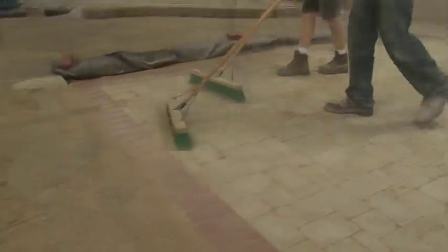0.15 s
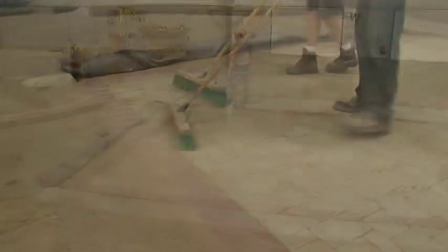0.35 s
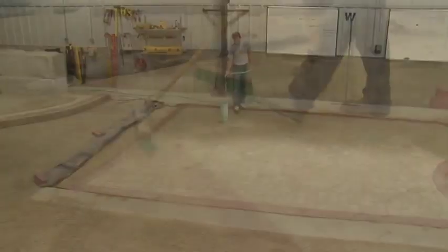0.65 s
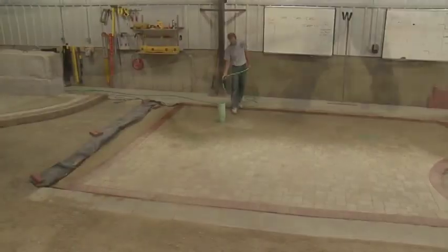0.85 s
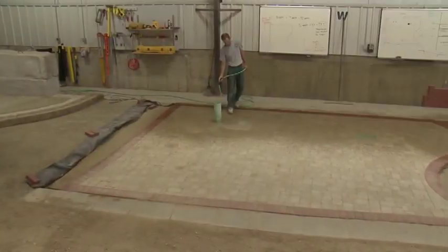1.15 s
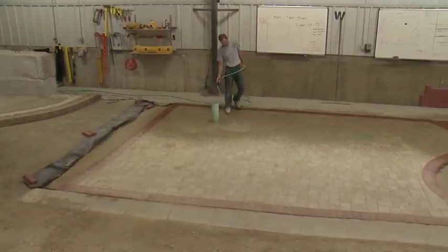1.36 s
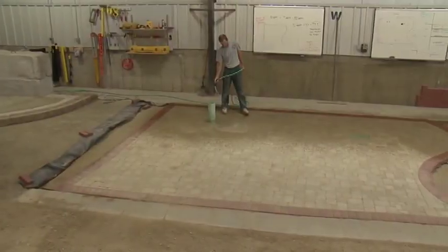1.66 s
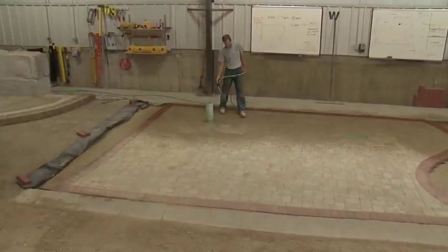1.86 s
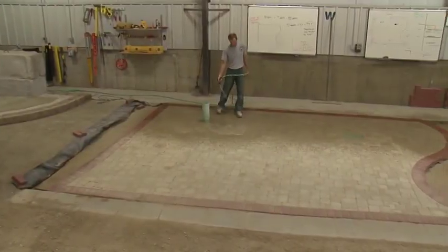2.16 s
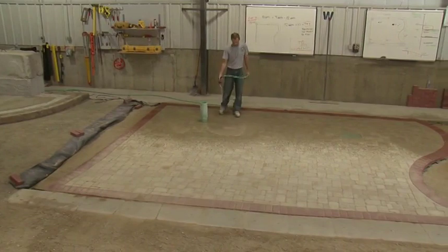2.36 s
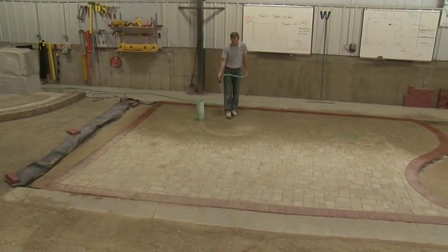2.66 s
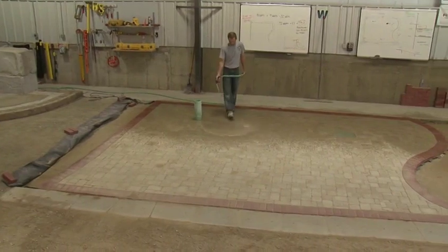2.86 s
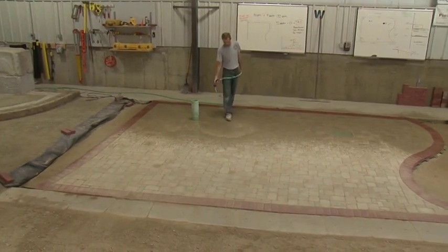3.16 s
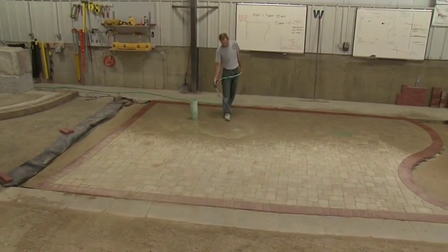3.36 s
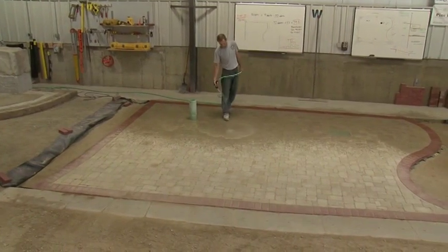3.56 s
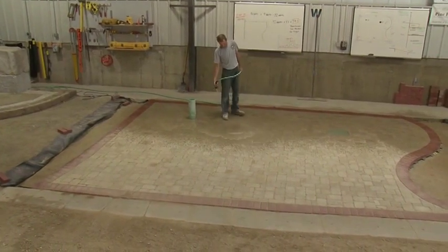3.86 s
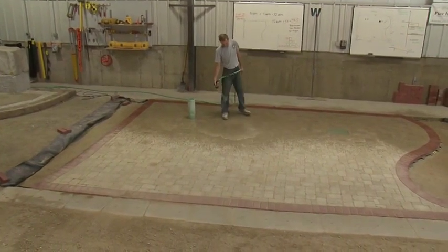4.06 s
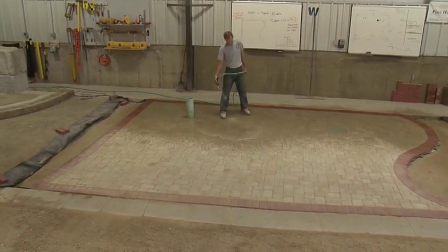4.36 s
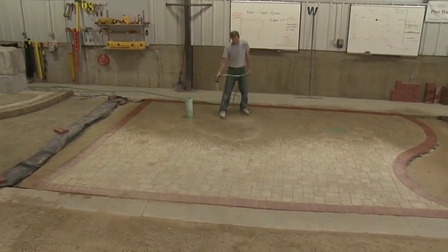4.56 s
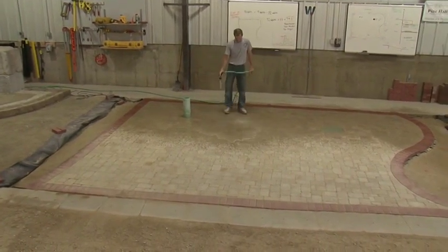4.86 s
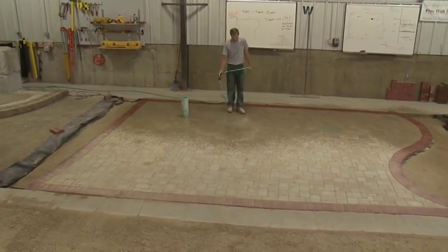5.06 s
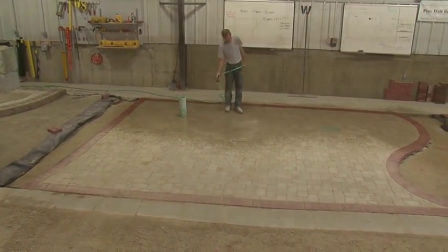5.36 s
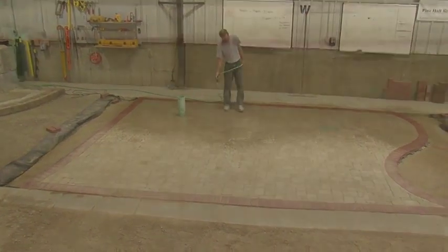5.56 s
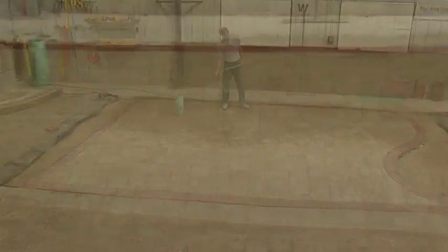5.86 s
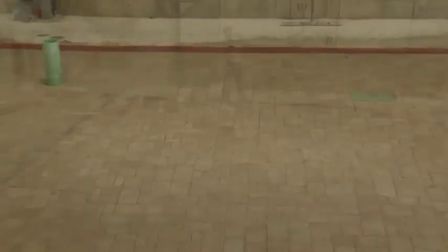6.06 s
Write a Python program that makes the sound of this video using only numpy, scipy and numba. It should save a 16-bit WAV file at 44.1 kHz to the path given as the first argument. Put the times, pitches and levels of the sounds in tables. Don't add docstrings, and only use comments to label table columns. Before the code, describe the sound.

Continuous scratchy sweeping, nearly all treble, with a hollow sliding colour that shifts on every stroke. Sharp grain snaps crowd the first three seconds, then thin out. Low dull bumps land near two seconds and again, strongest, near five. Beneath lie quiet air and distant machinery rumble. The single distant microphone hears a lightly reverberant shed, essentially centred, before a final fade.

```python
import sys
import numpy as np
from scipy import signal
from scipy.fft import rfft, irfft
from scipy.io import wavfile
from scipy.ndimage import uniform_filter1d, map_coordinates
from numba import njit

SR = 44100
rng = np.random.default_rng(int(sys.argv[2]) if len(sys.argv) > 2 else 0)


def store_wav(level_fs):
    pcm = np.round(np.clip(np.atleast_2d(level_fs), -1, 1) * 32767)
    wavfile.write(sys.argv[1], SR, pcm.T.astype(np.int16))


def invert_db(x):
    u = np.asarray(x, float) / 20
    return 10 ** u


N = 273155

# start_s [s], peak_db [dB], ring_hz [Hz]
BIG_HITS = [(0.5651, -2, 5980), (0.7527, -3, 5540), (0.8104, -4, 6660), (0.8919, -5, 6650),
            (1.0164, -4, 6260), (1.075, -3, 7240), (1.3544, -4, 6800), (1.477, -2, 6860),
            (1.5095, -1, 7220), (1.7175, -3, 7400), (1.9255, -4, 5850), (1.9679, -2, 8070),
            (2.0484, -4, 11600), (2.2593, -3, 5040), (2.4678, -4, 7190), (2.5257, -4, 7700),
            (2.596, -5, 8450), (2.6688, -2, 9130), (2.8624, -3, 9300), (3.039, 0, 7330),
            (3.0614, -1, 5280), (3.2201, -2, 5480), (3.9724, -3, 6590), (4.0128, -2, 4310),
            (4.1091, -4, 8280), (4.5835, -3, 9750), (4.7975, -2, 9180), (5.2574, -4, 4070),
            (5.2914, -3, 6450), (5.439, -3, 7600)]
# middle_s [s], length_s [s], low_loss_db [dB], middle_loss_db
# [dB]
BAND_DIPS = [(0.036, 0.062, 13, 10), (0.199, 0.055, 9, 8), (0.298, 0.089, 11.5, 4.5),
             (0.423, 0.15, 10, 6.5), (0.588, 0.088, 9, 9), (.7, 0.039, -3, -3), (0.946, 0.19, 11, 8),
             (1.21, 0.15, 10, 9), (1.552, 0.06, 5.5, 8), (1.611, 0.074, 7, 8.5), (1.72, .04, 7, 5),
             (1.79, 0.032, 26, 9), (1.869, .03, 10, 15), (2.079, 0.058, 19, 27), (2.647, .04, 1, 9.5),
             (3.322, 0.13, 19, 8.5), (3.408, 0.053, 18, -1), (3.582, 0.049, 22, 6), (3.76, 0.073, 13, 1),
             (4.177, .045, 16, -20), (4.263, 0.048, 44, 7), (4.415, 0.047, 17, -20), (4.518, 0.11, 8, -12),
             (4.92, 0.032, 16, 16), (5.325, 0.088, 10, 9.5), (5.835, 0.17, 10, 8.5), (5.996, 0.062, 7, 11),
             (6.075, 0.074, 10, 9.5)]
SNAP_LAG_S = 0.0009


def unit(x):
    return x / np.sqrt(np.mean(x ** 2))


def curve(table):
    s, *columns = np.transpose(table)
    return [np.interp(np.arange(N) / SR, s, c) for c in columns]


def humps(table, order=2):
    t = np.arange(N) / SR
    total = 0
    for middle_s, length_s, *heights in table:
        hump = np.clip(1 - (2 * (t - middle_s) / length_s) ** order, 0, 1)
        total = total + np.outer(heights, hump)
    return total


def walk(rate):
    k = int(SR / rate)
    held = np.repeat(rng.standard_normal(N // k + 1), k)
    return 0.79 * uniform_filter1d(held, k)[:N]


def shape_db(table, hz):
    f, db = np.transpose(table)
    return np.interp(np.log(np.maximum(hz, 1)), np.log(f), db)


def colour(x, table, size=4096):
    cep = irfft(np.log(invert_db(shape_db(table, np.arange(size // 2 + 1) * SR / size))))
    cep[1:size // 2] *= 2
    cep[size // 2 + 1:] = 0
    return signal.fftconvolve(x, irfft(np.exp(rfft(cep))))[:N]


def band(x, lo_hz, hi_hz):
    return signal.sosfilt(signal.butter(3, [lo_hz, hi_hz], "band", fs=SR, output="sos"), x)


def below(x, hz, order=3):
    return signal.sosfiltfilt(signal.butter(order, hz, fs=SR, output="sos"), x)


@njit
def rings(start, hz, t60, size, glide, length):
    out = np.zeros(length)
    for k in range(len(start)):
        p = np.exp(2j * np.pi * hz[k] / SR - np.log(1000) / (t60[k] * SR))
        turn = np.exp(2j * np.pi * hz[k] * glide / (SR * SR * t60[k]))
        z = size[k] + 0j
        for i in range(start[k], min(length, start[k] + int(t60[k] * SR))):
            out[i] += z.imag
            z, p = z * p, p * turn
    return out


def struck(s, size, hz, t60, glide=0.):
    return rings((s * SR).astype(int), hz, t60, size, glide, N)


def spray():
    # time_s [s], level_db [dB], brightness_db [dB]
    effort = [(0, -21.5, -12), (.5, -25, -5), (1.0, -23, -6.5), (1.6, -24, -2.5), (2.1, -22.5, -7),
              (2.5, -26.5, 2.5), (2.85, -28, 4.5), (3.2, -24.5, -3), (3.6, -23.5, -4.5), (3.8, -24.5, -3),
              (4.1, -24, -5.5), (4.3, -26, 5), (4.47, -30.5, 0.5), (4.75, -24, 0), (5.1, -28.5, 3.5),
              (5.5, -24, -5), (6.19, -26, -5)]
    # middle_s [s], length_s [s], body_db [dB], rasp_db [dB]
    surges = [(.66, 0.1, 11, 4), (.82, 0.21, 4.5, 1.5), (1.08, 0.063, -1, 5.5), (1.655, 0.047, 13, -2.5),
              (1.87, 0.062, 3, -2), (2.625, 0.039, 19, 1.5), (2.76, 0.053, 9, 3.5), (3.05, 0.066, 9, -1),
              (3.67, 0.068, 8, 1.5), (3.94, 0.063, 3, -0.5), (4.65, 0.21, 3.5, 2), (4.96, 0.091, 17, 9.5),
              (5.04, 0.18, -13, 6), (5.28, 0.051, 2, -2.5)]
    level_db, bright_db = curve(effort)
    push_db = swings()[1]
    scuff_body_db, scuff_rasp_db = humps(surges)
    low_loss_db, middle_loss_db = humps(BAND_DIPS)

    grit_db = level_db + push_db - 1.5
    top_db = bright_db - 0.98 * push_db
    steady_db = level_db.mean() + 0.27 * (level_db - level_db.mean())
    body_db = steady_db - 23.5 + 0.23 * push_db + scuff_body_db - 0.63 * low_loss_db + 2.0 * walk(14)
    rasp_db = steady_db - 11.3 + 0.48 * push_db + scuff_rasp_db - 0.22 * middle_loss_db

    stream = patter()
    body = below(stream, 678)
    low = below(stream, 3510)
    top = stream - below(stream, 10000, order=1)
    tilted_top = top * invert_db(top_db - top_db.mean())
    grit = (stream - low - top + tilted_top) / np.std(band(stream, 4070, 7860))
    bed = invert_db(grit_db) * grit + invert_db(body_db) * unit(body) + invert_db(rasp_db) * unit(low - body)

    hold_s, hold_db = 0.009, -6
    holds = [(s - hold_s / 2 + SNAP_LAG_S, hold_s, hold_db) for s, _, _ in BIG_HITS]
    return slab(bed * invert_db(humps(holds, order=4)[0]) + snaps())


def swings():
    # near_s [s], notch_fall_hz [Hz], push_db [dB]
    near_ends = [(.07, 150, 3.5), (.3, 280, 0.5), (.57, 333, 7), (.8, 200, -0.5), (1.05, 220, 6),
                 (1.33, 220, 4), (1.55, 280, -0.5), (1.88, 200, 4), (2.17, 420, 1.5), (2.46, 430, 8),
                 (2.76, 420, 6), (3.05, 430, 9), (3.31, 170, 0), (3.6, 350, 3.5), (3.94, 580, 9),
                 (4.34, 480, -1), (4.72, 450, 2), (4.98, 400, 6), (5.27, 450, 10.5), (5.5, 330, 1.5),
                 (5.79, 400, 2.5), (6.1, 120, 2)]
    turns = curve([(row[0], k) for k, row in enumerate(near_ends)])[0]
    swing = (1 + np.cos(2 * np.pi * turns)) / 2
    fall_hz, push_db = curve(near_ends)
    return fall_hz * swing, push_db * (swing ** 2.9 - .5)


def patter(scatter_db=5.0, cycles=22.7, ring_db=3.5, hiss_db=1.0, bunch_db=1.0):
    # freq_hz [Hz], density_db [dB per Hz]
    grit_spectrum = [(120, -30.5), (200, -18.5), (305, -19), (547, -14.5), (621, -15), (832, -10),
                     (1240, -9.5), (2360, -11), (2890, -14), (4080, -2), (6810, 0.5), (13400, -2.5),
                     (14400, -3.5), (15900, -13)]
    when, rarity, pitch, sign = rng.random((8000, 4)).T
    start = (when * (N - 1)).astype(int)
    biggest_db, longest_s = 14., .004
    size_db = biggest_db * np.tanh(-scatter_db * np.log(1 - rarity) / biggest_db)
    size = invert_db(size_db) * np.sign(sign - .5)
    ticks = np.bincount(start, size, N)
    hz = 500 + 15000 * pitch ** 1.282
    ring = rings(start, hz, np.minimum(cycles / hz, longest_s), size * np.sqrt(hz), 0.46, N)
    grains = unit(ticks) + invert_db(ring_db) * unit(ring) + invert_db(hiss_db) * rng.standard_normal(N)
    bunches = invert_db(bunch_db * (walk(25) + walk(90)))
    return colour(grains * bunches, grit_spectrum)


def snaps():
    # time_s [s], rate [snaps per s]
    chance_rate = [(0, 4), (.6, 26), (2.9, 30), (3.3, 13), (4.4, 7), (5.0, 10), (5.9, 8), (6.19, 0)]
    expected = np.cumsum(curve(chance_rate)[0]) / SR
    when, strength = rng.random((int(expected[-1]), 2)).T
    loose_s = np.interp(when * expected[-1], expected, np.arange(N) / SR)
    loose_db = -5.5 + 3 * strength ** 2
    spread_octaves = 0.27 * rng.standard_normal(len(when))
    loose_hz = np.clip(7300 * 2 ** spread_octaves, 4000, 14500)

    big = np.transpose(np.array(BIG_HITS) + [SNAP_LAG_S, 1.5, 0])
    s, db, hz = np.hstack([big, [loose_s, loose_db, loose_hz]])
    sign, low_draw, high_draw = rng.random((len(s), 3)).T
    size = invert_db(db) * np.sign(sign - .5)
    low_hz, high_hz = 1200 + 2500 * low_draw, 5000 + 9000 * high_draw
    main = struck(s, invert_db(-.5) * size, hz, 17. / hz, 0.05)
    low = struck(s, invert_db(-16.0) * size, low_hz, 1.5 / low_hz)
    high = struck(s, invert_db(-13.5) * size, high_hz, 12. / high_hz)
    return band(main + low + high, 1030, 16000)


def slab(x):
    # time_s [s], notch_spacing_hz [Hz]
    reach = [(0, 2950), (.48, 3140), (.85, 3070), (1.7, 3190), (2.3, 3340), (2.65, 3700), (2.95, 3700),
             (3.25, 3450), (3.8, 3600), (4.18, 3790), (4.58, 4230), (4.9, 4400), (5.32, 4500), (5.42, 3330),
             (6.19, 3250)]
    # time_s [s], share [0-1]
    mirror = [(0, .48), (2.2, .5), (3, .42), (4.4, .55), (5.3, .5), (5.35, .1), (5.43, .1), (5.48, .5),
              (6.19, .5)]
    above_hz, wobble_hz = 7600, 55.
    spacing_hz = curve(reach)[0] - swings()[0] + wobble_hz * walk(21.74)
    lag = SR / spacing_hz
    late = map_coordinates(x, [np.maximum(np.arange(N) - lag, 0)], order=3)
    flutter = invert_db(2.2 * walk(11) - .3)
    return x - curve(mirror)[0] * flutter * (late - below(late, above_hz))


def knocks(lag_s=0.00218):
    # start_s [s], peak_db [dB], ring_hz [Hz], t60_s [s]
    dull_knocks = [(0.813, -18.5, 990, 0.02), (1.643, -19, 660, 0.035), (1.654, -22, 560, 0.019),
                   (1.666, -22, 1120, 0.017), (1.859, -12.5, 247, 0.027), (1.87, -36, 345, 0.031),
                   (2.607, -25, 252, 0.01), (2.6175, -19.5, 1200, 0.02), (2.618, -28, 750, 0.013),
                   (2.617, -24, 383, 0.028), (2.658, -22, 1300, 0.014), (2.664, -24, 784, 0.045),
                   (3.917, -13, 966, 0.0041), (3.953, -28.5, 564, 0.08), (4.937, -9.5, 505, 0.026),
                   (4.948, -13, 380, 0.04), (4.96, -12.5, 553, 0.028), (4.974, -15, 400, 0.023),
                   (4.989, -19, 420, 0.025)]
    # start_s [s], peak [linear], ring_hz [Hz], t60_s [s]
    bumps = [
        (1.872, 0.077, 27.3, 0.36),
        (2.1, .04, 110, 0.13),
    ]
    s, peak_db, hz, t60 = np.transpose(dull_knocks)
    s = s + lag_s
    ring = struck(s, invert_db(peak_db + 2.5), hz, t60 * 0.58)
    ring += struck(s + 4, invert_db(peak_db - 13.5), np.full(len(s), 1250.), t60 * 0.7)
    kicks = np.bincount((s * SR).astype(int), invert_db(peak_db - 17.0), N)
    puff_level = signal.lfilter([1], [1, -np.exp(-1 / (0.013 * SR))], kicks)
    puff = puff_level * unit(band(rng.standard_normal(N), 250, 2430))
    bump_s, bump_peak, bump_hz, bump_t60 = np.transpose(bumps)
    return puff - band(ring, 68, 5500) + struck(bump_s, bump_peak, bump_hz, bump_t60)


def shed(x, t60=0.74, wet_db=-10.5):
    t = np.arange(SR // 2) / SR
    tail = rng.standard_normal(len(t)) * invert_db(-60 * t / t60) * (t > .004)
    return x + invert_db(wet_db) * signal.fftconvolve(x, tail / np.linalg.norm(tail))[:N]


def rumble():
    # freq_hz [Hz], density_db [dB per Hz]
    air_spectrum = [(11, -24), (18, -5.5), (64, 6), (129, -7), (172, -9.5), (201, -16.5), (305, -25.5),
                    (400, -17), (520, -31.5), (880, -120)]
    # time_s [s], level_db [dB]
    air_level = [(0, -41.5), (.8, -40), (2.1, -42.5), (3.0, -39), (3.45, -44), (3.7, -40.5), (4.65, -42.5),
                 (4.88, -36), (5.1, -42.5), (6.19, -42)]
    air = colour(rng.standard_normal(N), air_spectrum)
    level_db = curve(air_level)[0] + 3.1 * walk(7.8)
    return invert_db(level_db) * air / np.std(band(air, 33, 96))


def fade():
    return curve([(0, 0.43), (0.27, 1), (5.5, 1), (N / SR, 0.13)])[0]


def scene():
    mid = (shed(spray() + knocks()) + rumble()) * fade()
    return np.array([mid, mid])


def starve(x, low_db=-20.0, high_db=-16.0, short=0.96, size=1024):
    hz, s, cells = signal.stft(x, SR, nperseg=size, noverlap=size * 3 // 4)
    power = uniform_filter1d(np.abs(cells) ** 2 + 1e-18, size=5, axis=1)
    treble = power[(hz > 4000) & (hz < 12000)].mean(axis=0)

    def blurred(bins, frames):
        noise = uniform_filter1d(rng.standard_normal(power.shape), size=bins, axis=0)
        return uniform_filter1d(noise, size=frames)

    limit_db = np.interp(hz, [300, 2800], [low_db, high_db])[:, None] + 0 * s
    limit_db += 6 * blurred(3, 4)
    ragged = np.clip(1 + 1.6 * blurred(4, 9), 0, 2)
    bands_hz = (170, 845), (1300, 3250)
    for (lo_hz, hi_hz), loss_db in zip(bands_hz, humps(BAND_DIPS, order=4)):
        across = np.clip(1 - (2 * (hz - lo_hz) / (hi_hz - lo_hz) - 1) ** 4, 0, 1)
        limit_db += short * ragged * np.outer(across, np.interp(s * SR, np.arange(N), loss_db))
    gap_db = 10 * np.log10(uniform_filter1d(power, size=4, axis=0) / treble) - limit_db
    keep = np.clip(gap_db, 0, 1)
    keep[(hz < 190) | (hz > 3400)] = 1
    return signal.istft(cells * keep, SR, nperseg=size, noverlap=size * 3 // 4)[1][:N]


def roll_off(x):
    return signal.sosfilt(signal.butter(12, 16280, fs=SR, output="sos"), x)


def record(dry):
    # middle_s [s], length_s [s], side_db [dB re mid]
    splits = [(0.044, 0.044, -21), (.37, 0.034, -22), (0.694, 0.035, -13), (0.736, .04, -10.5),
              (1.184, 0.043, -16.5), (1.614, 0.041, -18), (2.892, 0.03, -13), (3.297, 0.029, -12),
              (4.191, 0.023, -13), (4.509, 0.02, -20), (4.982, 0.035, -11), (5.17, .04, -13),
              (5.221, 0.062, -13), (5.506, 0.049, -15), (5.687, 0.059, -11), (6.03, 0.045, -18)]
    mid = np.tanh(.9 * starve(dry[0])) / .9
    apart = humps([(s, length_s, invert_db(side_db)) for s, length_s, side_db in splits])[0]
    side = apart * np.roll(mid - 0.59 * below(mid, 1800, order=1), shift=700)
    top_cut = signal.ellip(8, .2, 70, 15950, fs=SR, output="sos")
    mix = signal.sosfilt(top_cut, [mid + side, mid - side])
    return roll_off(mix)


dry = scene()
out = record(dry)
store_wav(out)
```